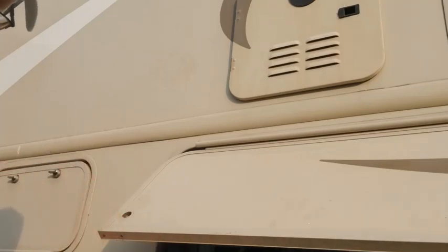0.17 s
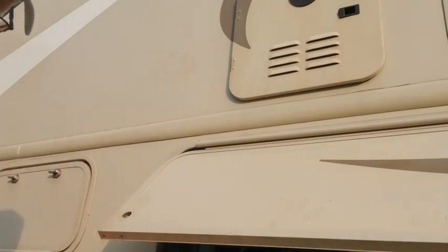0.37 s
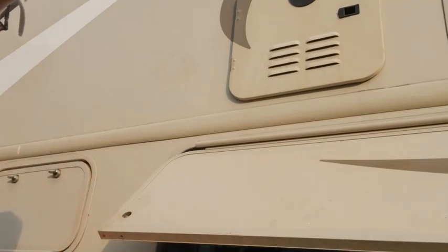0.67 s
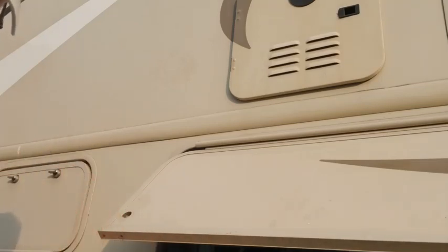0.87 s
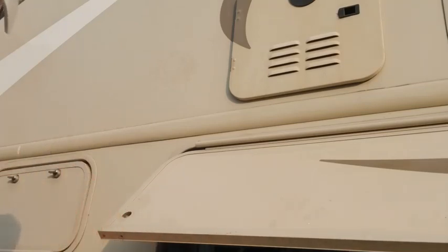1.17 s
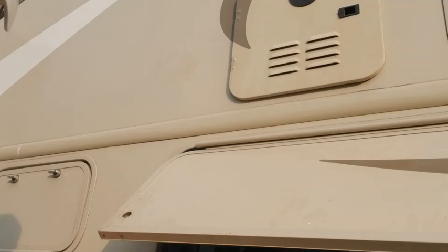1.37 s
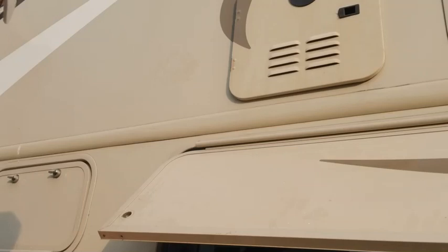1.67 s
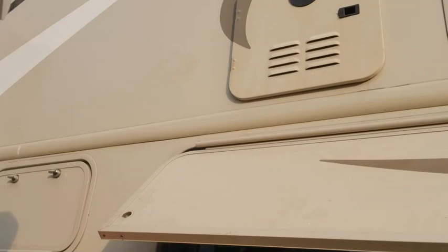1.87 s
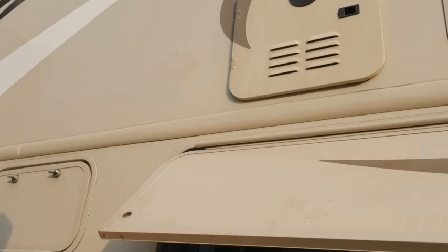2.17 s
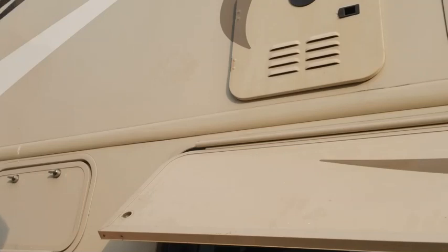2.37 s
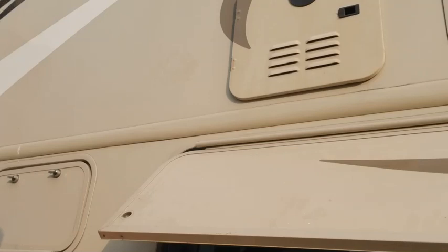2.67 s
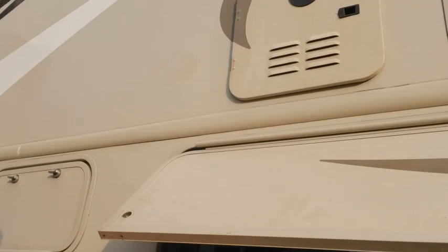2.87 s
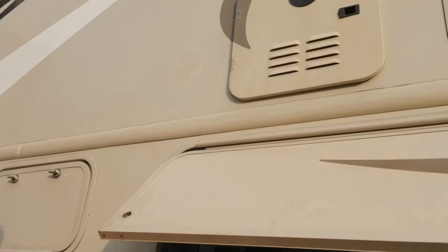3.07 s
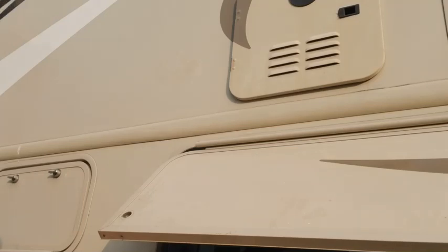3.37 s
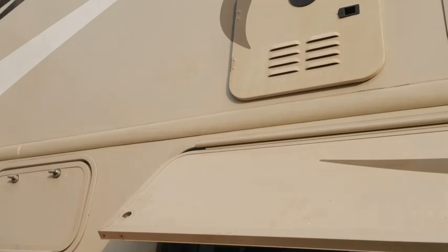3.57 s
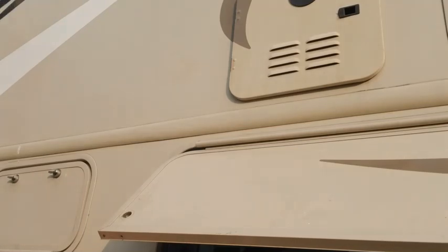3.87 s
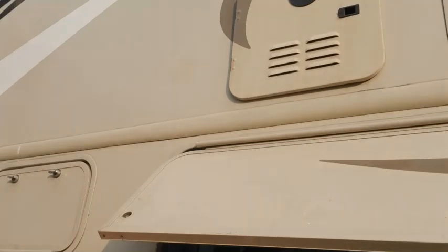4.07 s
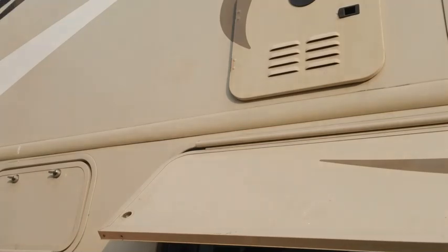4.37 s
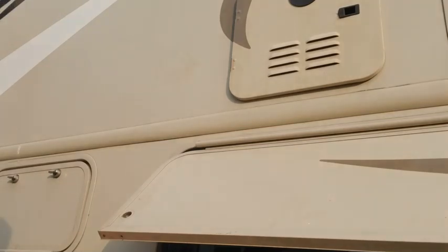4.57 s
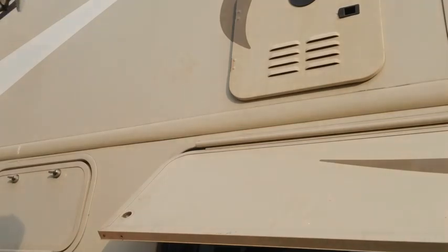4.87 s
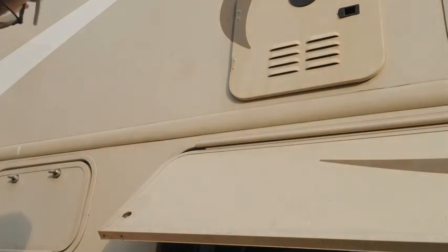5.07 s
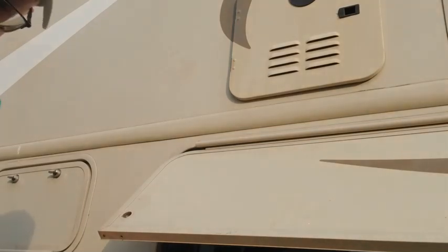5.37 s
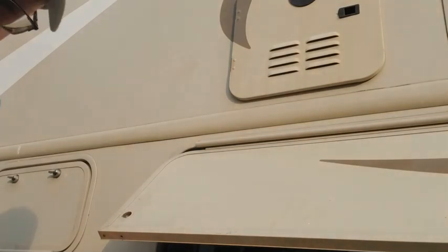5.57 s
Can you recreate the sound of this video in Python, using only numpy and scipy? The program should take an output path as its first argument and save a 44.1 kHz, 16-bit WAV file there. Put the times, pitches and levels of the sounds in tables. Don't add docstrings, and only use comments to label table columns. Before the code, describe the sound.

Close stereo pickup of a small metal lock being fiddled with by hand: light taps, sharp clicks, short scrapes and quickly damped high clinks, with soft skin rustle and a few low bumps. The loudest click comes near 3.9 seconds, then it quiets until final taps. Distant birds and uneven traffic rumble stay behind.

```python
import sys
import numpy as np
from scipy import signal
from scipy.fft import rfft, irfft, next_fast_len
from scipy.io import wavfile
from scipy.ndimage import uniform_filter1d, map_coordinates

SR = 44100
rng = np.random.default_rng(int(sys.argv[2]) if len(sys.argv) > 2 else 0)


def generate_wav(signal):
    frames = np.transpose(np.atleast_2d(signal))
    scaled = np.clip(frames, -1, 1) * 32767
    pcm = np.round(scaled).astype(np.int16)
    wavfile.write(sys.argv[1], SR, pcm)


def undo_db(level):
    steps = np.asarray(level, float) / 20
    return 10 ** steps


N = 252252


def unit(x):
    return x / np.sqrt(np.mean(x ** 2) + 1e-20)


def along(points, hz):
    f, v = np.transpose(points)
    return np.interp(np.log(hz + 1), np.log(f + 1), v)


def curves(rows):
    s, *cols = np.transpose(rows)
    return [np.interp(np.arange(N) / SR, s, c) for c in cols]


def wobble(rate):
    knots = rng.standard_normal(int(N * rate / SR) + 4)
    return map_coordinates(knots, [np.arange(N) * rate / SR])


def coloured(x, spectrum):
    m = next_fast_len(N + 8192)
    gain = unit(undo_db(along(spectrum, np.fft.rfftfreq(m, 1 / SR))))
    return irfft(rfft(x, m) * gain, m)[..., :N]


def pair(alike):
    a, b = rng.standard_normal((2, N))
    alike = np.clip(alike, 0, 1)
    return np.array([alike * a + np.sqrt(1 - alike ** 2) * b, a])


def sides(pan_db):
    left = undo_db(pan_db)
    return np.array([left, left ** 0]) * np.sqrt(2 / (1 + left ** 2))


def ringing(x, modes, gain_db):
    m = next_fast_len(N + 8192)
    f = np.fft.rfftfreq(m, 1 / SR)
    answer = 0
    for centre, width, db in modes:
        resonance = 1j * f * width / (centre * centre - f * f + 1j * f * width)
        answer = answer + undo_db(db + gain_db) * resonance
    return irfft(rfft(x, m) * (1 + answer), m)[..., :N]


def lumpy(x, depth_db):
    z = signal.stft(x, nperseg=512)[2]
    field = rng.standard_normal(z.shape[1:])
    field = uniform_filter1d(field, size=4, axis=0)
    field = uniform_filter1d(field, size=5, axis=1)
    gain = unit(undo_db(depth_db * unit(field)))
    return signal.istft(z * gain, nperseg=512)[1][:, :N]


# start in seconds, peak in dB.
TAPS = [(.196, -48.5), (.2321, -42.5), (.5134, -46), (.7493, -43.5), (.761, -41.5), (.775, -45),
        (.858, -39), (.8634, -33.5), (.881, -40), (.912, -40), (.931, -53), (1.0152, -45), (1.0675, -38),
        (1.1533, -36), (1.2457, -59), (1.2567, -50), (1.349, -35), (1.3839, -41), (1.403, -40),
        (1.478, -65), (1.609, -52), (1.868, -52), (2.005, -51), (2.948, -40), (2.995, -43), (3.0947, -49),
        (3.1252, -38), (3.1541, -41), (3.1716, -34), (3.177, -31), (3.186, -39), (3.841, -45),
        (3.604, -46.5), (.8764, -38), (.886, -26.5), (1.1266, -39), (1.148, -38), (1.1633, -46),
        (1.1902, -29.5), (1.318, -36), (1.3748, -37), (1.424, -31.5), (1.591, -49), (1.6774, -41.5),
        (1.8002, -30), (2.0303, -39.5), (2.0882, -40.5), (2.153, -50), (2.399, -37), (2.4415, -37.5),
        (2.913, -43), (3.7885, -38), (4.566, -41), (4.5756, -41.5), (5.4898, -40.5), (5.508, -44),
        (5.5666, -36), (5.5945, -28), (5.6222, -28.5), (5.611, -36), (5.628, -42)]
# start in seconds, peak in dB.
CLICKS = [(.733, -46), (.7823, -32.5), (.896, -27), (.9077, -20.5), (.9236, -29), (.9994, -39),
          (1.029, -37), (1.1976, -23), (1.217, -44), (1.335, -29.5), (1.3405, -27), (1.4113, -20),
          (1.92, -38.5), (1.9402, -30), (2.0571, -33), (2.4259, -45), (2.5667, -24), (2.586, -20),
          (2.5962, -27), (2.605, -28), (3.159, -24), (3.89, -5), (4.5068, -44), (4.69, -52), (1.813, -35),
          (2.31, -53), (3.49, -36), (3.592, -43), (2.501, -41), (3.806, -41)]
# start in seconds, peak in dB.
TINKS = [(.9562, -30.5), (1.058, -35), (1.074, -27), (1.3004, -31.5), (1.511, -16.5), (1.5315, -18),
         (2.5411, -20), (2.7556, -27.5), (3.484, -38), (3.966, -22), (4.447, -49), (1.165, -43), (.95, -51),
         (1.29, -37), (3.117, -29), (3.201, -24), (3.236, -35), (3.306, -45), (3.393, -34), (3.912, -27),
         (2.9986, -33), (3.0245, -32), (3.046, -23.5), (3.1053, -25), (3.182, -25), (3.1916, -24),
         (3.3545, -17.5), (3.4984, -27), (3.547, -32), (3.7065, -42), (3.9314, -30), (3.9684, -21),
         (4.1798, -38), (4.1942, -38), (4.2188, -32), (4.35, -34.5), (4.5171, -28.5), (5.5147, -35),
         (5.657, -41)]
# start in seconds, peak in dB.
FLICKS = [(5.5157, -40), (5.5357, -47), (5.5462, -40), (5.5621, -35), (5.583, -36), (5.635, -47),
          (5.662, -46), (1.5808, -52), (1.916, -52), (1.9295, -53), (2.2981, -53), (2.3919, -44),
          (1.03, -51), (1.042, -47), (1.08, -49), (1.362, -52), (1.395, -51), (.892, -35), (.918, -42)]
# start in seconds, peak in dB.
KNOCKS = [(0.082, -48.5), (0.906, -45), (1.126, -41), (1.195, -37.5), (1.321, -40), (1.373, -36.5),
          (1.411, -30), (1.509, -48), (1.798, -43.5), (2.44, -38.5), (2.596, -54), (3.889, -29.5),
          (5.513, -43), (5.619, -53)]


def ticks():
    out = np.zeros((3, N + 2000))
    t = np.arange(2000) / SR
    rise = 1 - np.exp(-t / 0.00047)
    for rows, body_db in (TAPS, -2), (CLICKS, -12), (TINKS, -22.5), (FLICKS, 0):
        for s, db in rows:
            fall = undo_db(db + np.array([[1.4], [body_db + 4.5]]) - 60 * t / 0.008)
            out[:2, round(s * SR):][:, :2000] += fall * rise
    for s, db in KNOCKS:
        out[2, round(s * SR):][:2000] += undo_db(db - 6.5 - 60 * t / 0.028) * rise
    return out[:, :N]


# start in seconds, fastest moment in seconds, end in seconds,
# steel level in dB, body over steel in dB.
STROKES = [(0.852, 0.9, 1.004, -55, 3.5), (0.96, 0.957, 0.99, -49, -11), (1.009, 1.03, 1.06, -47, -6.5),
           (1.05, 1.07, 1.13, -45.5, -9.5), (1.12, 1.2, 1.13, -56.5, 3.5), (1.31, 1.4, 1.41, -52, -1.5),
           (1.507, 1.515, 1.558, -27, -17.5), (2.554, 2.605, 2.643, -30.5, -13),
           (2.58, 2.657, 2.734, -38, -13.5), (2.752, 2.77, 2.82, -50, -10), (2.79, 2.85, 2.98, -46, -14),
           (2.99, 3.07, 3.19, -43, -18), (3.088, 3.12, 3.18, -37.5, -13.5), (3.155, 3.185, 3.3, -30, -21),
           (3.15, 3.18, 3.225, -43.5, -5), (3.29, 3.37, 3.43, -42.5, -15), (3.468, 3.49, 3.71, -48, -15.5),
           (3.887, 3.892, 3.906, -17.5, -17), (3.9, 3.956, 4.107, -36, -16.5),
           (4.178, 4.21, 4.26, -50.5, -20), (4.29, 4.32, 4.38, -62, -27), (4.498, 4.515, 4.71, -54.5, -8.5),
           (5.085, 5.106, 5.13, -59.5, -31), (4.439, 4.46, 4.53, -58, -17), (5.48, 5.5, 5.6, -61, 1),
           (5.51, 5.601, 5.685, -48.5, 1.5)]


def slides():
    slips_per_s, slip_db, slip_s = 97, 6, 0.00068
    speed_up_db, slow_down_db, drag = 7, 32.5, 1.81
    out = np.zeros((3, N))
    chance = rng.random((2, N))
    slip_hits = (chance[0] < slips_per_s / SR) * chance[1]
    slips = signal.lfilter([1], [1, -np.exp(-1 / (slip_s * SR))], slip_hits)
    grain = 1.1 * wobble(400) + 3.2 * wobble(90) + slip_db * 2 * np.minimum(slips, 1)
    for start, fastest, end, db, body_db in STROKES:
        t = np.arange(round(start * SR), round(end * SR)) / SR
        moving = np.clip(np.minimum(t - start, end - t) / .005, 0, 1)
        before = np.maximum((fastest - t) / (fastest - start), 0)
        after = np.maximum((t - fastest) / (end - fastest), 0)
        speed_db = db - speed_up_db * before - slow_down_db * after ** drag
        shares_db = np.array([[-.4], [body_db + 2.47], [body_db - 8.5]])
        out[:, round(start * SR):][:, :len(t)] += moving * undo_db(speed_db + shares_db)
    return out * [unit(undo_db(grain)), unit(undo_db(0.68 * grain)), unit(undo_db(0.53 * grain))]


# time in seconds, skin rustle in dB.
GRIP = [(0, -75.5), (.72, -72), (1.07, -61.5), (1.7, -65.5), (1.99, -62), (2.34, -67), (2.52, -60),
        (2.67, -67.5), (3.25, -62.5), (3.62, -75), (4.11, -74.5), (4.87, -79), (5.46, -79), (5.72, -67)]
# time in seconds, level in dB.
JANGLE = [(0, -82.5), (.72, -78), (1.07, -67.5), (1.7, -69.5), (3.03, -73), (3.25, -59), (3.71, -68),
          (4.87, -94.5), (5.72, -81)]


def rustles():
    (skin_db,), (steel_db,) = curves(GRIP), curves(JANGLE)
    usual_db = skin_db.mean()
    palm_db = usual_db + 1.5 + 0.7 * (skin_db - usual_db)
    steel_db = steel_db + 6.5 + 3.3 * wobble(15)
    skin_db = skin_db + 2.05 * wobble(10)
    palm_db = palm_db - 0.5 + 2.0 * wobble(10)
    return undo_db([steel_db, skin_db, palm_db])


# frequency in Hz, width in Hz, level in dB.
PARTS = [(6500, 90, 8.5), (8470, 45, -3.5), (10990, 296, -5), (12750, 160, -2), (14560, 420, 1.5)]
# frequency in Hz, level in dB per Hz.
STEEL = [(2940, -56.5), (5000, -14.5), (6230, -20.5), (7130, -24), (7760, -17.5), (9960, -7), (12900, -2),
         (14100, -7.5), (16000, -18), (16500, -60)]
# time in seconds, left over right in dB.
PLACE = [(0, -11), (1.4, -11.5), (2.2, -8), (2.6, -13), (3.5, -15), (3.9, -9), (5.1, -10), (5.45, -5),
         (5.72, -1)]


def steel_parts(contact, shiver):
    noise = ringing(contact * pair(0.33), PARTS, -.1) + shiver * pair(.3)
    return undo_db(-3.5) * sides(curves(PLACE)[0]) * coloured(noise, STEEL)


# frequency in Hz, width in Hz, level in dB.
CASE = [(2720, 500, 7), (4190, 300, 2), (6020, 540, -1)]
# frequency in Hz, width in Hz, level in dB.
CASE_TURNED = [(1510, 500, 5), (4300, 750, 4), (5430, 600, 3.5)]
# frequency in Hz, width in Hz, level in dB.
SHELL = [(2700, 640, -7), (4206, 200, -10.5)]
# frequency in Hz, level in dB per Hz.
SKIN = [(3200, -1), (6500, -4.5)]
# frequency in Hz, level in dB per Hz.
BODY = [(590, -18.5), (1000, -1), (1340, 0), (2100, 2), (2930, 1), (5900, -1.5), (7000, -7.5), (9100, -15),
        (15400, -120)]


def lock_body(struck, rubbed, rustle):
    knocked = struck * pair(0.63)
    turned = np.arange(N) > 4.8 * SR
    case = ringing(knocked * ~turned, CASE, 0.1) + ringing(knocked * turned, CASE_TURNED, 0.1)
    shell = ringing(rubbed * lumpy(pair(0.26), 2.5), SHELL, 0.63)
    skin = rustle * coloured(pair(0.072), SKIN)
    body = coloured(shell + undo_db(-3.0) * case + undo_db(2.5) * skin, BODY)
    return undo_db(-1.0) * sides(3.5)[:, None] * body


# frequency in Hz, level in dB per Hz.
HAND = [(71, -36.5), (120, -10.5), (227, -20), (389, -15), (710, -17), (2000, -25.5), (2600, -56),
        (4400, -120)]


def holding_hand(contact, rustle):
    hand = coloured(np.hypot(contact, rustle) * pair(0.62), HAND)
    return undo_db(5.0) * sides(1.2)[:, None] * hand


def lock():
    struck, rubbed, rustle = ticks(), slides(), rustles()
    steel, _, hand = np.hypot(struck, rubbed)
    body = lock_body(struck[1], rubbed[1], rustle[1])
    return steel_parts(steel, rustle[0]) + body + holding_hand(hand, rustle[2])


# start in seconds, part, level in dB, seconds it rings until a finger damps it.
CLINKS = [(0.955, "ring", -46, 0.012), (1.058, "held", -43, .01), (1.511, "held", -26.5, .015),
          (2.568, "held", -34, .02), (2.597, "held", -25, 0.019), (2.835, "held", -45, .03),
          (3.345, "cam", -47, .03), (3.51, "cam", -52, .1), (3.79, "cam", -60, .05),
          (4.214, "held", -45, .02), (4.565, "held", -54.5, 0.017), (3.092, "ring", -36, 0.011),
          (3.262, "ring", -36, .02), (3.328, "ring", -42, 0.026), (3.892, "latch", -35, 0.018),
          (3.946, "latch", -49, .08), (3.9, "spring", -40, .03), (3.98, "tongue", -46.5, 0.098),
          (3.5, "tongue", -50.5, 0.12), (2.998, "ring", -46, 0.036), (3.104, "clip", -29, .055),
          (3.159, "washer", -27.5, .02), (3.171, "washer", -19, 0.107), (3.178, "pin", -19, 0.12),
          (3.194, "clip", -23, 0.11), (3.309, "ring", -35, 0.07), (3.308, "washer", -35, 0.14),
          (3.355, "ring", -34.5, 0.12), (3.499, "clip", -36.5, 0.07), (3.498, "spring", -48, .05),
          (3.548, "spring", -39.5, .05), (3.565, "ring", -37, 0.16), (3.707, "clip", -64, 0.039),
          (3.89, "bolt", -21.5, 0.13), (3.932, "cam", -24, 0.11), (4.18, "ring", -56.5, 0.057),
          (4.507, "bolt", -52, 0.02), (4.513, "ring", -45.5, 0.028), (4.515, "cam", -62, 0.047)]
# frequency in Hz, level in dB, seconds to fall by 60 dB.
FREE = dict(ring=[(12900, 0, .45), (8481, -13.5, .5)], pin=[(12602, 0, .35), (7983, -8, .35)],
        clip=[(12635, 0, .35), (15565, -14, .2)], washer=[(12805, 0, .5), (15565, -9, .12)],
        spring=[(10614, 0, .3), (7983, -12, .15), (6389, -16, .1)], bolt=[(13050, -2, .17),
        (10869, -3, .45), (10548, -6, .4), (6389, -11, .6), (6425, -14, .3), (12026, -14, .25),
        (15341, -14, .25), (8549, -16, .4)], latch=[(2105, -4, .12), (900, -6, .06), (2439, -4, .2),
        (3112, -1, .15), (3257, -6, .15), (5292, -3, .15), (6180, 2, .05), (6309, 3, .15)],
        held=[(13150, 0, .12), (12780, -1, .12), (10850, -7, .1), (11400, -10, .08)], tongue=[(6389, 0, .5),
        (6363, -6, .3)], cam=[(15502, 0, .4), (10799, -2, .3), (15624, -6, .4), (13050, -8, .3)])


def clinks():
    out = np.zeros((2, N + SR))
    shakes = rng.standard_normal((len(CLINKS), 8, 3, 40))
    for (s, part, db, rings_s), rattle in zip(CLINKS, shakes):
        t = np.arange(round(min(rings_s + .12, .33) * SR)) / SR
        damping_db = 60 * np.maximum(t - rings_s, 0) / min(.085, 2.5 * rings_s)
        for (hz, mode_db, t60), shake in zip(FREE[part], rattle):
            flutter, drift, skew = (map_coordinates(knots, [t * 110]) for knots in shake)
            level_db = db + mode_db + 3.0 + 3.04 * flutter - 60 * t / t60 - damping_db
            fade = undo_db(level_db) * (1 - np.exp(-t / .0008))
            left_db = -13.0 if hz > 9000 else -5.0
            left_phase = 3.6 * shake[2, -1] + 0.75 * skew
            phase = 2 * np.pi * hz * t + 0.55 * drift + np.array([left_phase, 0 * t])
            out[:, round(s * SR):][:, :len(t)] += [[undo_db(left_db)], [1]] * fade * np.sin(phase)
    return out[:, :N]


# middle in seconds, frequency in Hz, level in dB, half length in seconds.
BUMPS = [
    (1.9, 71.5, -25, 0.0056),
    (2.035, 79.4, -38, 0.019),
    (2.753, 66.6, -32, 0.017),
    (4.982, 65.3, -32.5, 0.011),
]


def bumps():
    t = np.arange(N) / SR
    out = np.zeros(N)
    for s, hz, db, half in BUMPS:
        out += undo_db(db) * np.exp(-((t - s) / half) ** 2) * np.sin(2 * np.pi * hz * (t - s))
    return sides(20.0)[:, None] * out


# time in seconds, level in dB.
SCUFF = [
    (2.28, -84),
    (2.345, -52.5),
    (2.49, -57),
    (2.58, -74),
]
# frequency in Hz, level in dB per Hz.
PANEL = [(380, -14), (650, -9.5), (1050, -8), (1600, -36)]


def scuff():
    t = np.arange(N) / SR
    on = (t > SCUFF[0][0]) & (t < SCUFF[-1][0])
    return on * undo_db(curves(SCUFF)[0] + 1.7 * wobble(39.98)) * coloured(pair(0.74), PANEL)


# time in seconds, frequency in Hz, level in dB.
WHISTLES = [
    [(1.93, 3180, -62), (1.96, 3060, -56), (1.983, 3020, -70)],
    [(1.987, 3020, -62), (2.005, 2950, -55), (2.03, 2980, -66), (2.075, 2920, -66)],
    [(2.085, 2500, -66), (2.1, 2150, -64), (2.12, 1980, -63), (2.15, 1960, -68)],
    [(2.155, 2350, -70), (2.17, 2450, -64), (2.195, 2430, -70), (2.215, 2520, -63)],
    [(2.17, 2750, -70), (2.19, 2900, -63), (2.21, 2900, -69)],
    [(2.6, 2343, -62), (2.645, 2000, -62), (2.665, 2300, -68), (2.69, 3000, -59), (2.712, 3400, -60),
     (2.728, 3060, -59), (2.74, 2400, -62), (2.75, 1890, -67), (2.77, 1870, -63), (2.785, 1870, -68)],
    [(3.405, 2536, -70), (3.45, 2600, -68)],
    [(3.255, 2300, -67), (3.3, 2200, -70), (3.34, 2200, -72)],
    [(1.732, 4350, -68), (1.742, 4200, -66), (1.755, 3750, -69)],
    [(1.76, 2800, -70), (1.775, 2600, -66), (1.79, 2500, -71)],
]


def whistler():
    t, out = np.arange(N) / SR, np.zeros(N)
    for rows in WHISTLES:
        hz, db = curves(rows)
        on = (t > rows[0][0]) & (t < rows[-1][0])
        level = np.sqrt(2) * undo_db(db + 3.5 + 4.0 * wobble(120))
        turns = np.cumsum(hz * (1 + 0.0215 * wobble(140))) / SR
        out += on * level * np.sin(2 * np.pi * turns)
    return out


# middle in seconds, frequency in Hz, level in dB, overtone in dB.
CHIRPS = [(.055, 2230, -72, -20), (.1, 2250, -68, 0), (.215, 2400, -65, -9), (.33, 2350, -66, -6),
          (.46, 2330, -66, -1), (.6, 2450, -66, -7), (.385, 2150, -72, -20), (.475, 3520, -75, -20),
          (.64, 2420, -72, -20), (.6, 3550, -75, -20), (.72, 2600, -66, -12), (4.63, 2270, -66, -5),
          (4.735, 2380, -66, 2), (4.83, 2400, -66, -1), (4.945, 2480, -66, 2), (5.065, 2520, -68, -7),
          (5.19, 2550, -70, -12), (5.33, 2500, -70, -12), (5.435, 2500, -73, -12), (4.95, 3750, -77, -20),
          (5.175, 2950, -74, -20), (5.185, 3850, -78, -20), (5.285, 2950, -73, -20), (5.3, 3850, -75, -20),
          (5.41, 2900, -73, -20), (5.45, 3950, -75, -20)]


def chirper():
    out = np.zeros(N)
    blur = undo_db(4 * wobble(110) - 1.5)
    u = np.linspace(-3, 3, round(6 * .018 * SR))
    for s, hz, db, over_db in CHIRPS:
        first = round(s * SR) - len(u) // 2
        near = slice(first, first + len(u))
        phase = 2 * np.pi * np.cumsum(hz * (.98 - .03 * u - .016 * u * abs(u))) / SR
        tone = np.exp(-(u - .3) ** 2) * np.sin(phase)
        overtone = undo_db(over_db + 4) * np.exp(-1.5 * (u + .7) ** 2) * np.sin(2 * phase)
        out[near] += blur[near] * undo_db(db + 1.5) * (tone + overtone)
    return out


def yard(x):
    t = np.arange(SR // 4) / SR
    tail = rng.standard_normal((2, len(t))) * undo_db(-60 * t / 0.05)
    tail = tail / np.linalg.norm(tail[0])
    return x + undo_db(-9) * signal.fftconvolve(x, tail, axes=1)[:, :N]


def birds():
    return yard(sides(28.0)[:, None] * (whistler() + chirper()))


# time in seconds, level in dB, left over right in dB.
TRAFFIC = [(0.0, -60, 4.5), (0.27, -55.5, 7), (1.53, -54, -1.5), (1.85, -49, 6.5), (3.31, -60.5, -5.5),
           (3.44, -50.5, 16), (3.71, -60, -6.5), (3.97, -55, 4.5), (5.32, -61, 1.5), (5.72, -59, 0.5)]
# frequency in Hz, level in dB per Hz.
RUMBLE = [(12, -36), (20, -10.5), (70, 1.5), (113, -7.5), (134, -23), (165, -21.5), (195, -23.5),
          (300, -26.5), (390, -38), (660, -120)]


def traffic():
    db, pan_db = curves(TRAFFIC)
    lumps = undo_db(2.3 * np.array([wobble(8), wobble(4.0)]))
    return undo_db(db + 7.0) * sides(pan_db + 1.5) * unit(lumps * coloured(pair(0.63), RUMBLE))


# frequency in Hz, level in dB per Hz.
HUSH = [(76, -28), (130, 5), (259, -7.5), (789, -24), (1010, -36.5), (1700, -33.5), (2460, -22.5),
        (3130, -36), (5200, -22.5), (6760, -68), (7640, -55), (9940, -27), (12700, -22.5), (15200, -26),
        (16500, -53)]
# frequency in Hz, left over right in dB.
HUSH_BALANCE = [(60, -7.5), (110, 3), (200, -0.5), (380, 7), (700, -10.5), (1290, 20.5), (2380, 7.5),
                (4400, 5.5), (8120, -7), (15000, -1)]


def hush():
    air = coloured(pair(0.23), HUSH)
    air[0] = coloured(air[0], HUSH_BALANCE)
    level = undo_db(-67.5 + np.array([[4.0], [2.5]]) + 4.0 * wobble(2.847))
    return level * air / np.std(air, axis=1)[:, None]


def scene():
    near = lock() + scuff() + clinks() + birds()
    near[0] = np.roll(near[0], 14)
    return near + bumps() + traffic() + hush()


def top_cut(x):
    return signal.sosfilt(signal.butter(12, 17030, fs=SR, output="sos"), x)


def record(dry):
    rounded = dry / (1 + abs(dry / .52) ** 4) ** (1 / 4)
    low_pass = signal.cheby2(10, 30, 16200, fs=SR, output="sos")
    mix = signal.sosfilt(low_pass, rounded)
    return top_cut(mix)


dry = scene()
out = record(dry)
generate_wav(out)
```